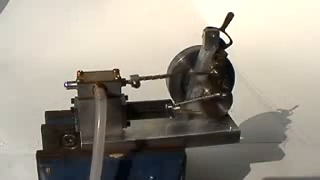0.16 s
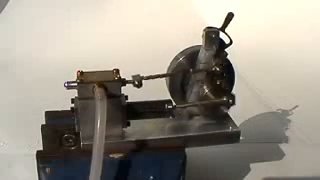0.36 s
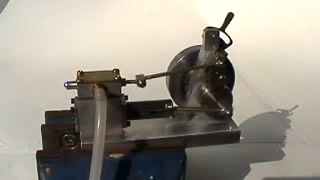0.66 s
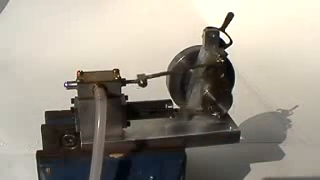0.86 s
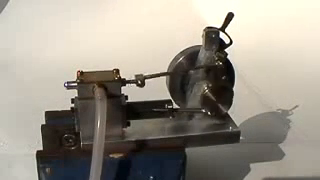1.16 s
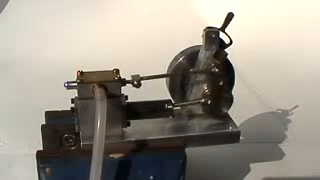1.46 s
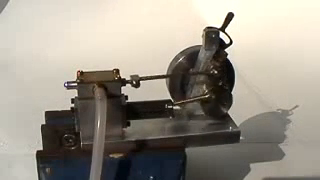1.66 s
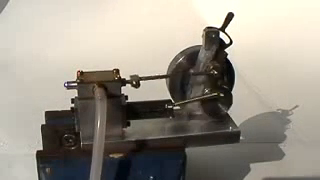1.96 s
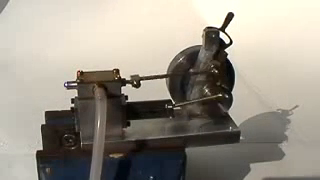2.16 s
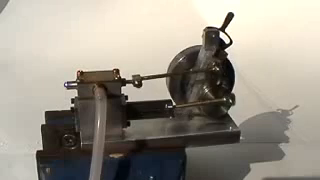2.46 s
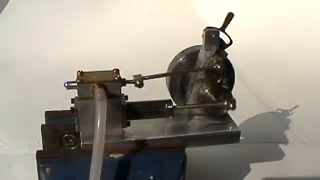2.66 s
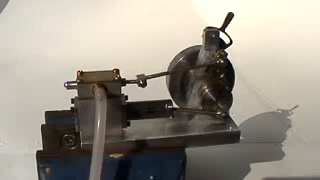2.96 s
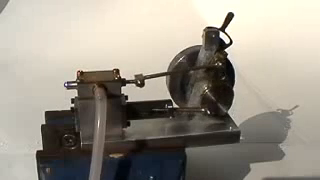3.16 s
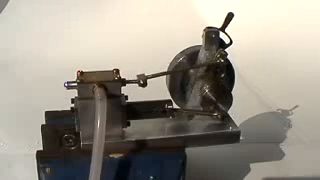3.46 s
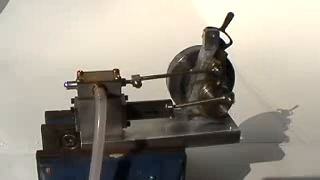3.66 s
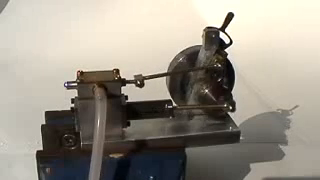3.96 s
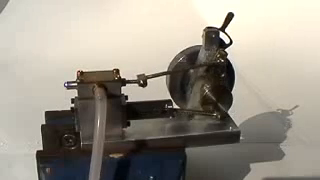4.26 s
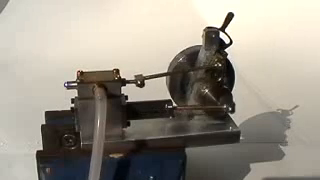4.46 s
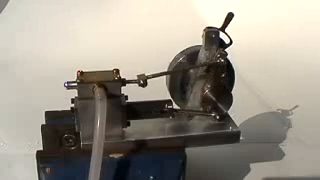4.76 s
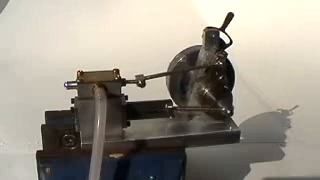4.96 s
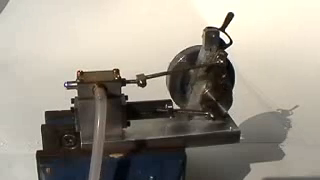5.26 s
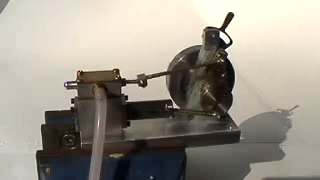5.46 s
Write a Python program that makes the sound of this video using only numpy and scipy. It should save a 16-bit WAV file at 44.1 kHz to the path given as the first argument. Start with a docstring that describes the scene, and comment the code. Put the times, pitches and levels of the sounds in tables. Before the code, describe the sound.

A small single-cylinder engine runs on compressed air, close to the microphone. Rapid alternating clacks and thumps carry short air puffs and dull exhaust pops over constant hiss and low bearing rumble. It speeds up slightly, a bed drone swells, then just after three seconds the air weakens and the pace falls, with small squeaks and bumps. Short reflections suggest a bench near walls; bass leans left.

```python
"""A small single-cylinder mill engine on compressed air, close by: air hisses through gaps, the bearing rumbles.
Each dead centre takes up rod play: struck modes clack and thump, gated noise puffs, the exhaust passage pops.
It quickens slightly; from 2.3 s the bed drone swells. Just after 3.1 s the air drops and the engine slows.
After that come brief slide squeaks and box bumps; single rod slaps are harder, one before the drop, the rest after."""
import sys
import numpy as np
from scipy import signal
from scipy.fft import rfft, irfft, next_fast_len
from scipy.io import wavfile

SR = 44100
rng = np.random.default_rng(int(sys.argv[2]) if len(sys.argv) > 2 else 0)


def generate_wav(signal):
    """Clip the signal to [-1, 1] and save it as 16-bit WAV at the path in sys.argv[1]."""
    frames = np.transpose(np.atleast_2d(signal))
    scaled = np.clip(frames, -1, 1) * 32767
    pcm = np.round(scaled).astype(np.int16)
    wavfile.write(sys.argv[1], SR, pcm)


N = 247401
TIME_S = np.arange(N) / SR
FREQ_HZ = np.fft.rfftfreq(N, 1 / SR) + 1e-3
RING_S = np.arange(SR // 5) / SR
SIDES = np.array([[1], [-1]])

# flywheel speed: (time [s], speed [turns/s])
SPEED_CURVE = [(0.0, 9.335), (1.428, 9.42), (1.714, 9.596), (2.618, 9.697), (3.127, 9.241), (3.344, 7.659),
               (3.643, 6.569), (4.327, 5.847), (4.65, 5.989), (5.61, 5.611)]
FULL_SPEED_TURNS_PER_S = 9.5
FIRST_KNOCK_TURN, CRANK_END_TURN = .0407, .4717  # first head-end knock; turn from head end to crank end

# shaft rumble spectrum: (frequency [Hz], level [dB])
RUMBLE_SPECTRUM = [(25, -22), (42, -4), (62, 1), (120, 3), (200, 0.5), (280, -4), (420, -5), (550, -8.5),
                   (680, -4), (880, -7), (1050, -14.5), (2000, -20.5)]
# box hum, before the swing within each turn: (time [s], level [dB])
HUM_CURVE = [(1.7, -49), (2.25, -42.5), (3.25, -34.5), (5.61, -36)]
DRONE_DB, DRONE_SPEED_POWER = -40, 0.87  # bed drone at full speed, before swell and swing
SWELL_FROM_S, SWELL_TO_S, SWELL_RAMP_S, SWELL_DB = 2.32, 3.12, 0.25, 7

# air supply: (time [s], leak level before the gain in leak() [dB], top hiss relative to the rest [dB])
AIR_SUPPLY = [(0, -27, -2.5), (2.6, -26, -3.5), (3.13, -27, -5), (3.19, -31, -7), (5.61, -31, -7)]
# broad leak spectrum: (frequency [Hz], level [dB])
LEAK_SPECTRUM = [(900, -11.5), (1400, -6.5), (1650, -5), (2300, -6.5), (3000, -7), (3900, -7.5), (4650, -5),
                 (5400, -5), (6200, -7), (7200, -3.5), (7900, -1.5), (9100, -6), (10000, 0), (11600, -7)]
# port resonances in the leak: (centre [Hz], width [Hz], level [dB])
PORT_RESONANCES = [(5786, 710, 2.5), (6700, 270, -5), (10804, 1060, 9.5)]

# box bumps and rattles on the bench: (time [s], frequency [Hz], t60 [s], level [dB])
BOX_BUMPS = [(4.152, 184, 0.016, -17.5), (4.199, 205, 0.036, -24), (4.533, 178, 0.035, -17.5),
             (5.122, 1000, 0.011, -27.5), (5.125, 675, 0.018, -30.5), (5.208, 202, 0.078, -26),
             (5.565, 364, 0.049, -32)]
# dry spots in the slide: (time [s], length [s], start [Hz], end [Hz], pitch wander [Hz], level [dB])
SLIDE_SQUEAKS = [(3.38, .36, 1540, 1540, 90, -41), (4.686, .019, 5500, 4700, 70, -22),
                 (4.694, .02, 5000, 3500, 90, -30)]

# exhaust passage resonances: (frequency [Hz], t60 [s], relative level [dB])
PASSAGE_MODES = [(655, .06, 0), (742, .045, -2), (875, .03, -6)]

# bed plate on its box:
# (frequency [Hz], t60 [s], relative level struck from head end [dB], from crank end [dB])
BED_MODES = [(88, 0.093, -25, -30), (141, 0.012, -18, -12.5), (234, 0.091, -19, -17.5),
             (311.4, 0.072, -7, -4), (379.2, 0.086, -0.06, -13.5), (502, 0.16, -9.5, -17.5),
             (1130, 0.015, -6.5, -30)]
# rod and crosshead: (frequency [Hz], t60 [s], relative level [dB])
ROD_MODES = [(1690, 0.012, -11), (1784, 0.017, -0.5), (2050, 0.01, 6), (2240, 0.016, -1),
             (2590, 0.024, -10.5), (2950, 0.039, -7), (6550, .015, 2), (8300, .025, 0.5)]
# contacts in one knock, head end then crank end: (lag [s], push on bed [dB], push on rod [dB])
HEAD_END_CONTACTS = [(.0003, 3, -2), (.0023, -37, -1), (.0133, -8.5, -12)]
CRANK_END_CONTACTS = [(.0003, 7.5, -3.5), (.004, -8.5, -1), (0.0266, 3.5, -9)]
# blow strength, head-end row then crank-end row, before scatter and contact pushes:
# (thump at full speed [dB], thump speed power [1], clack at full speed [dB], clack speed power [1])
END_BLOWS = [(-25.5, 1.88, -30.5, 1.7), (-31.5, 2.3, -31, 1.3)]
THUMP_SCATTER_DB, CLACK_SCATTER_DB = 1, 0.6  # knock to knock
# harder rod slaps, at the nearest dead centre: (time [s], extra clack [dB])
ROD_SLAPS = [(2.64, 3), (3.94, 2), (4.27, 4), (4.44, 2), (4.61, 4.5), (4.78, 3.5)]

# stereo lean: (frequency [Hz], left minus right [dB])
LEFT_LEAN = [(60, 6.5), (150, 7), (280, 5), (500, 1.8), (1000, .4), (3000, 0)]
TOP_HZ = 11450


def undb(db):
    """Decibels to gain."""
    return 10 ** (np.asarray(db) / 20)


def unit(x):
    """Scale to rms 1."""
    return x / np.sqrt(np.mean(x ** 2))


def curve(table):
    """Interpolate each column of a timed table to every sample."""
    times_s, *columns = np.transpose(table)
    return [np.interp(TIME_S, times_s, column) for column in columns]


def colour(points):
    """Gain at every frequency, linear in dB over log frequency."""
    hz, db = np.transpose(points)
    return undb(np.interp(np.log(FREQ_HZ), np.log(hz), db))


def resonance(hz, width_hz):
    """Response of one resonance, gain 1 at its centre."""
    return 1 / (1 + 1j * (FREQ_HZ ** 2 - hz ** 2) / (FREQ_HZ * width_hz))


def shape(x, response):
    """Filter by a frequency response, zero-padded against wrap-around."""
    size = next_fast_len(N + SR // 4, True)
    gain = np.interp(np.fft.rfftfreq(size, 1 / SR), FREQ_HZ, response)
    return irfft(rfft(x, size) * gain, size)[..., :N]


def noise(response):
    """Gaussian noise of rms 1 with that response."""
    return unit(shape(rng.standard_normal(N), response))


def apart(side_db):
    """Share of a diffuse sound that differs between the sides: only bass and low middle."""
    return undb(side_db) / (1 + (FREQ_HZ / 950) ** 8)


def wide(response, side_db):
    """Stereo noise: a common part plus a part of opposite sign on the two sides."""
    common = noise(response)
    side = shape(noise(response), apart(side_db))
    return common + side * SIDES


def walk(rate_hz):
    """Interpolated random points, spread near 1."""
    return 1.2 * np.interp(TIME_S * rate_hz, np.arange(4000), rng.standard_normal(4000))


def add(track, start_s, sound):
    """Mix a sound in at start_s."""
    i = max(int(start_s * SR), 0)
    track[i:i + len(sound)] += sound[:max(N - i, 0)]


def decay(t60_s):
    """Exponential fade, -60 dB at t60_s."""
    return np.exp(-np.log(1000) * RING_S / t60_s)


def modes(hz, t60_s):
    """Fading rings of struck modes, one row each."""
    return np.cos(2 * np.pi * np.outer(hz, RING_S)) * decay(np.asarray(t60_s)[:, None])


def swell(hz, t60_s, rise_s):
    """Softly pushed resonance: builds up, then fades; peak near 1."""
    size = decay(t60_s) * (1 - np.exp(-RING_S / rise_s)) ** 2
    return size / size.max() * np.sin(2 * np.pi * hz * RING_S)


def speed(times_s):
    """Flywheel speed as a share of full speed."""
    return np.interp(times_s, *np.transpose(SPEED_CURVE)) / FULL_SPEED_TURNS_PER_S


def dead_centres():
    """Piston reversal times [s] from the integrated speed, head end and crank end in turn."""
    turns = np.cumsum(FULL_SPEED_TURNS_PER_S * speed(TIME_S)) / SR - FIRST_KNOCK_TURN
    marks = (np.arange(np.ceil(turns[-1]))[:, None] + [0, CRANK_END_TURN]).ravel()
    return np.interp(marks[marks < turns[-1]], turns, TIME_S)


def strokes():
    """Running count of piston strokes, with fractions."""
    times_s = dead_centres()
    return np.interp(TIME_S, times_s, np.arange(len(times_s)))


def blows():
    """One (time [s], thump [dB], clack [dB]) per dead centre: the faster the wheel, the harder."""
    times_s = dead_centres()
    ends = np.arange(len(times_s)) % 2
    thump_db, thump_power, clack_db, clack_power = np.array(END_BLOWS)[ends].T
    speed_db = 20 * np.log10(speed(times_s))
    thump_chance, clack_chance = rng.standard_normal((len(times_s), 2)).T
    slap_db = np.zeros(len(times_s))
    for at_s, db in ROD_SLAPS:
        distance_s = abs(times_s - at_s)
        slap_db += db * (distance_s == distance_s.min())
    thump_db = thump_db + thump_power * speed_db + THUMP_SCATTER_DB * thump_chance
    clack_db = clack_db + clack_power * speed_db + CLACK_SCATTER_DB * clack_chance + slap_db
    return np.column_stack([times_s, thump_db, clack_db])


def room(x, wet_db=-13, side_db=-1, t60_s=0.34, gap_s=0.00615):
    """Short diffuse reflections of bench and near walls: convolution with fading noise."""
    tail = rng.standard_normal((2, len(RING_S))) * decay(t60_s) * (RING_S > gap_s)
    tail /= np.sqrt(np.sum(tail ** 2, axis=1, keepdims=True))
    mid, side = undb(wet_db) * signal.fftconvolve(x[None], tail, axes=1)[:, :N]
    return x + mid + shape(side, apart(side_db)) * SIDES


def bearing(rumble_db=-35.0, side_db=-9, uneven_db=1, load_db=2):
    """Shaft rub excites bed plate and box; least just before the head-end knock."""
    inside_s = np.minimum(TIME_S - SWELL_FROM_S, SWELL_TO_S - TIME_S)
    plate_db = DRONE_DB + SWELL_DB * np.clip(.5 + inside_s / SWELL_RAMP_S, 0, 1)
    rumble = wide(colour(RUMBLE_SPECTRUM), side_db) * undb(rumble_db + uneven_db * walk(40))
    plate = resonance(349.0, 66) ** 2 + undb(-5.5) * resonance(292.7, 41) ** 2
    drone = wide(plate, side_db) * undb(plate_db) * speed(TIME_S) ** DRONE_SPEED_POWER
    hum = wide(resonance(200, 110) ** 2, side_db) * undb(curve(HUM_CURVE)[0])
    swing_db = load_db * np.cos(2 * np.pi * (strokes() / 2 - .4))
    return (rumble + drone + hum) * undb(swing_db)


def leak(air_db=5.0, stroke_db=0.26, flutter_db=0.41,
         whistle_hz=5080, whistle_width_hz=480, whistle_db=-33, whistle_power=0.91):
    """Turbulent hiss through narrow gaps, a little harder after each stroke begins."""
    level_db, top_db = curve(AIR_SUPPLY)
    ports = sum(abs(undb(db) * resonance(hz, width_hz) ** 2) ** 2 for hz, width_hz, db in PORT_RESONANCES)
    gaps = np.sqrt(colour(LEAK_SPECTRUM) ** 2 + ports)
    air = noise(gaps * FREQ_HZ / np.hypot(FREQ_HZ, 500))
    top = shape(air, 1 / (1 + (9300 / np.maximum(FREQ_HZ, 100)) ** 20))
    # top hiss follows its own curve, duller after the air drops
    air = (air + top * (undb(top_db) - 1)) * undb(level_db + air_db)
    # one gap nearly whistles and fades less than the rest
    fade_db = whistle_power * (level_db - level_db.max())
    whistle = noise(resonance(whistle_hz, whistle_width_hz) ** 2) * undb(whistle_db + fade_db)
    swing_db = stroke_db * np.cos(2 * np.pi * (strokes() - .15))
    return (air + whistle) * undb(swing_db + flutter_db * walk(70))


def bumps(rise_s=0.014):
    """Soft bumps and rattles of the box: softly pushed resonances."""
    out = np.zeros(N)
    for start_s, hz, t60_s, db in BOX_BUMPS:
        add(out, start_s, undb(db) * swell(hz, t60_s, rise_s))
    return out


def squeaks():
    """Dry slide squeaks: uneven grip makes the pitch wander about its glide."""
    out = np.zeros(N)
    for start_s, length_s, start_hz, end_hz, wander_hz, db in SLIDE_SQUEAKS:
        n = int(length_s * SR)
        hz = np.linspace(start_hz, end_hz, n) + wander_hz * walk(400)[:n]
        tone = np.sin(2 * np.pi * np.cumsum(hz) / SR)
        add(out, start_s, undb(db) * np.hanning(n) * tone)
    return out


def exhaust(beats, puff_db=-2, fade_s=0.0047, open_s=0.0021, lags_s=(0.00778, 0.00653),
            pop_db=-30, end_pops_db=(-3, 0), pressure_power=2.1, rise_s=0.0037):
    """The valve cracks open with a spit of air; then the cylinder empties and the passage pops."""
    passage = sum(undb(db) * swell(hz, t60_s, rise_s) for hz, t60_s, db in PASSAGE_MODES)
    pressure = speed(TIME_S) ** pressure_power
    puff = np.exp(-RING_S / fade_s) * (1 - np.exp(-RING_S / open_s))
    flow, pops = np.zeros(N), np.zeros(N)
    for k, (start_s, _, clack_db) in enumerate(beats):
        end = k % 2
        add(flow, start_s, undb(clack_db) * puff)
        size = undb(pop_db + end_pops_db[end] + rng.standard_normal())
        add(pops, start_s + lags_s[end], size * passage)
    spit = undb(puff_db) * flow * noise(resonance(1970, 1500) * resonance(2700, 4000))
    return pressure * pops + spit


def knocks(beats, rod_db=-1, box_hz=180, box_t60_s=0.014, box_rise_s=0.023, box_ends_db=(5.0, 0),
           bed_scatter_db=1, rod_scatter_db=3.5, soft_hz=2200):
    """The rod hits its bearing and rebounds; every contact rings bed plate and rod modes."""
    bed_hz, bed_t60_s, *bed_ends_db = np.transpose(BED_MODES)
    rod_hz, rod_t60_s, rod_modes_db = np.transpose(ROD_MODES)
    bed_rings, rod_rings = modes(bed_hz, bed_t60_s), modes(rod_hz, rod_t60_s)
    box = swell(box_hz, box_t60_s, box_rise_s)
    bed, rod = np.zeros(N), np.zeros(N)
    for k, (start_s, thump_db, clack_db) in enumerate(beats):
        end = k % 2
        # the box underneath recoils against the blow
        add(bed, start_s, -undb(thump_db + box_ends_db[end]) * box)
        for lag_s, push_db, click_db in (HEAD_END_CONTACTS, CRANK_END_CONTACTS)[end]:
            weights = undb(bed_ends_db[end] + bed_scatter_db * rng.standard_normal(len(BED_MODES)))
            add(bed, start_s + lag_s, undb(thump_db + push_db) * weights @ bed_rings)
            weights = undb(rod_modes_db + rod_scatter_db * rng.standard_normal(len(ROD_MODES)))
            slop_s = rng.uniform(0, .0004)
            add(rod, start_s + lag_s + slop_s, undb(clack_db + click_db + rod_db) * weights @ rod_rings)
    # the oil film softens the blow that reaches the bed
    return shape(bed, 1 / (1 + 1j * FREQ_HZ / soft_hz) ** 2) + rod


def scene():
    """The engine in its room; the bass leans to the left side."""
    beats = blows()
    struck = knocks(beats) + exhaust(beats) + bumps() + squeaks()
    left, right = room(struck) + leak() + bearing()
    lean = colour(LEFT_LEAN)
    return np.array([shape(left, 2 * lean / (1 + lean)), shape(right, 2 / (1 + lean))])


def record(dry, low_hz=55):
    """The microphone drops the deep bass; the recorder cuts the top."""
    high_pass = signal.butter(3, low_hz, "high", fs=SR, output="sos")
    low_pass = signal.ellip(12, .2, 80, TOP_HZ, fs=SR, output="sos")
    return signal.sosfilt(low_pass, signal.sosfilt(high_pass, dry))


dry = scene()
out = record(dry)
generate_wav(out)
```